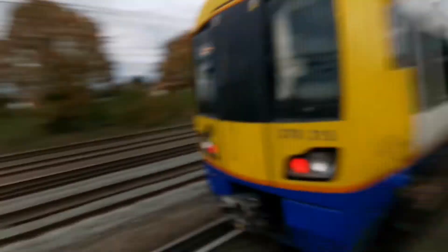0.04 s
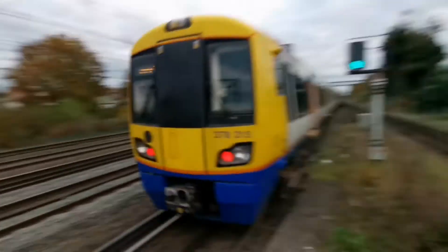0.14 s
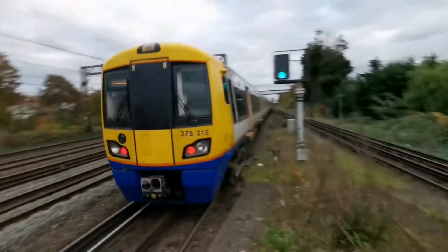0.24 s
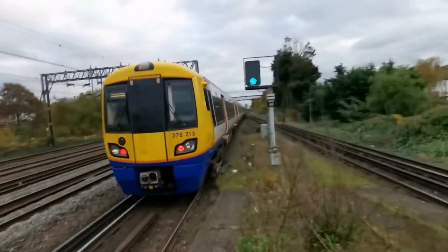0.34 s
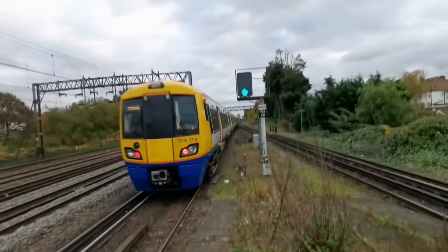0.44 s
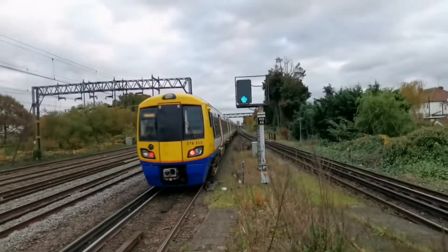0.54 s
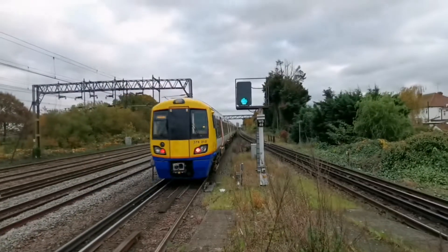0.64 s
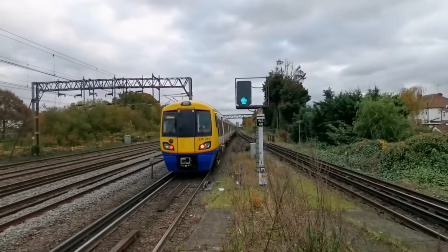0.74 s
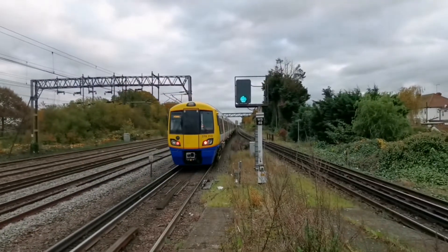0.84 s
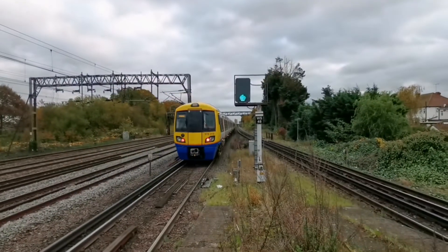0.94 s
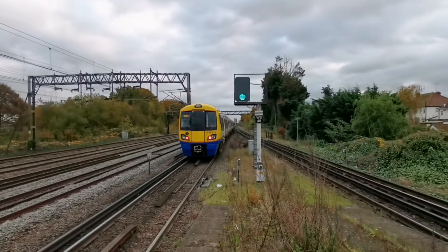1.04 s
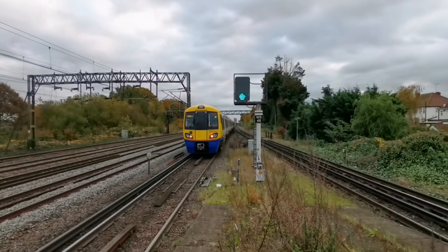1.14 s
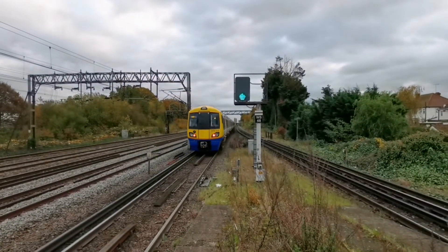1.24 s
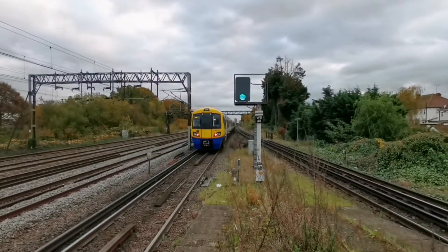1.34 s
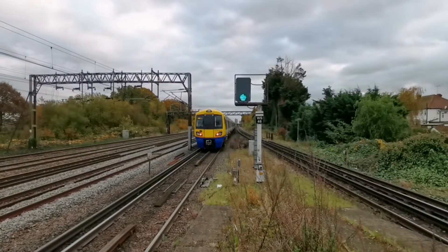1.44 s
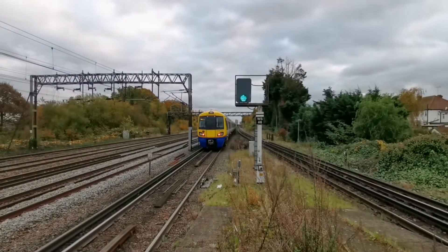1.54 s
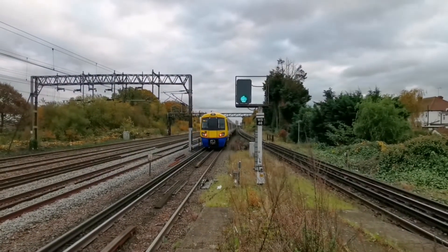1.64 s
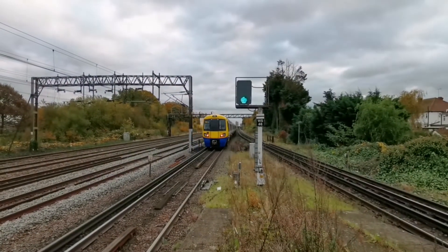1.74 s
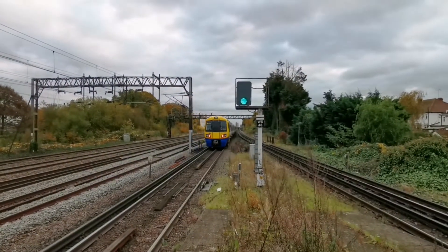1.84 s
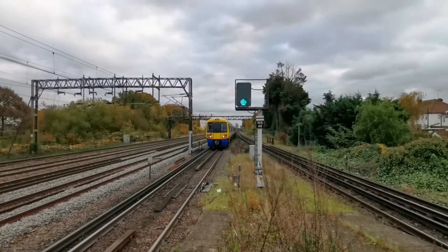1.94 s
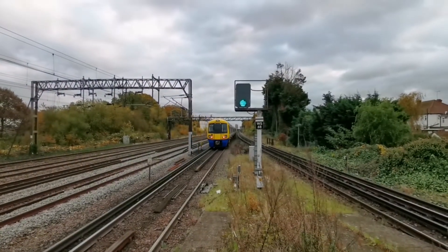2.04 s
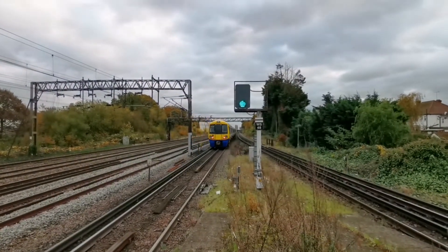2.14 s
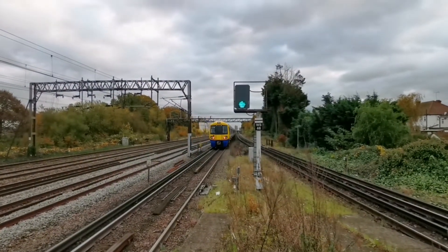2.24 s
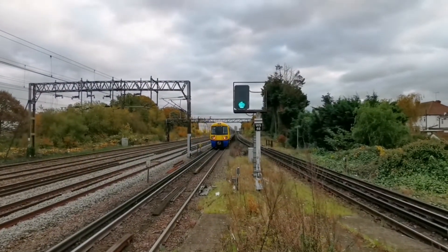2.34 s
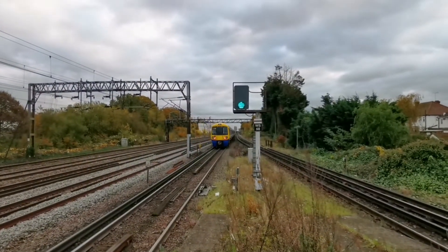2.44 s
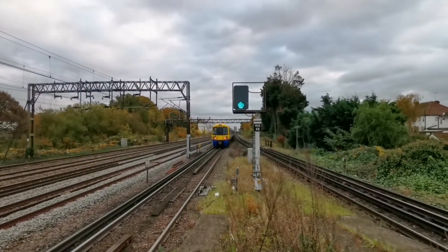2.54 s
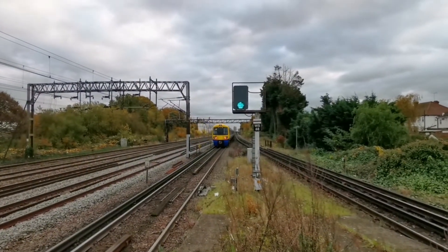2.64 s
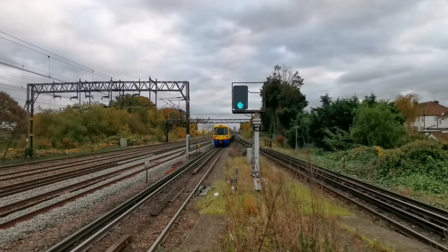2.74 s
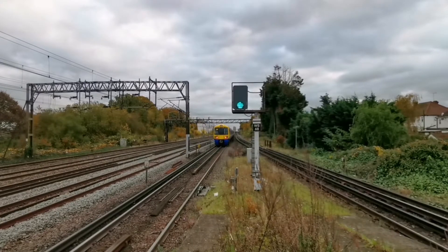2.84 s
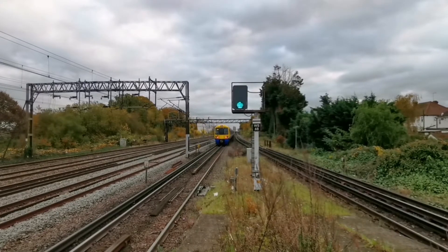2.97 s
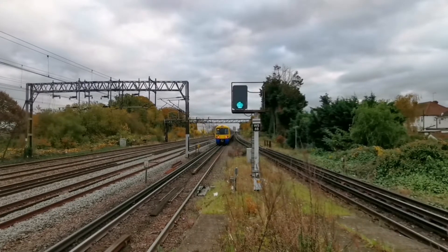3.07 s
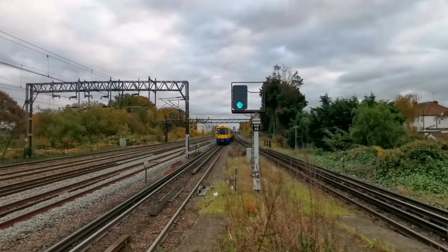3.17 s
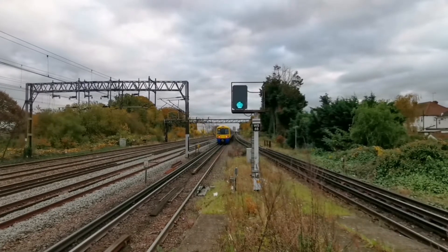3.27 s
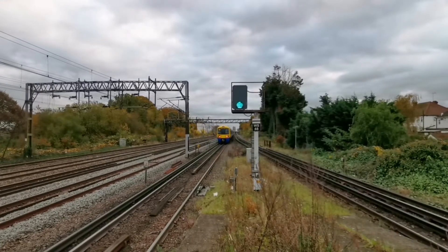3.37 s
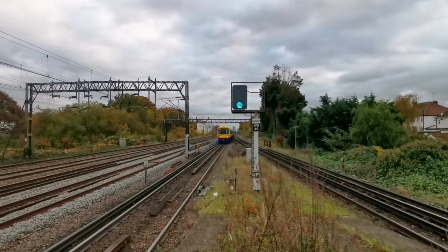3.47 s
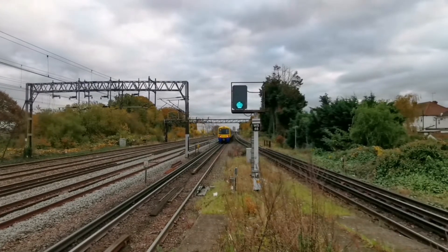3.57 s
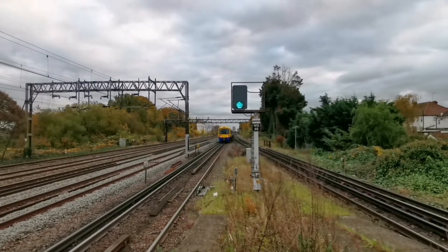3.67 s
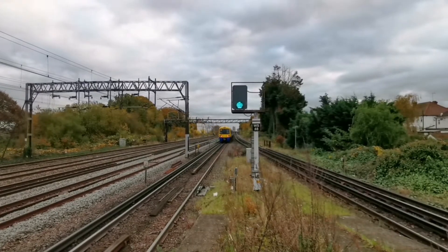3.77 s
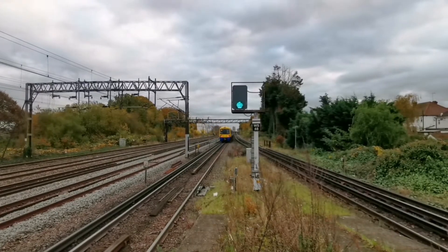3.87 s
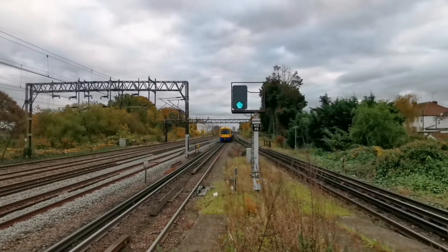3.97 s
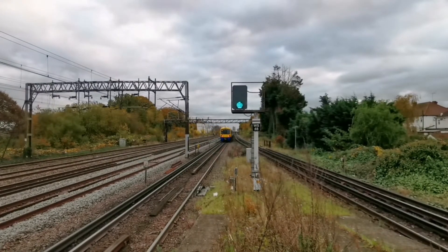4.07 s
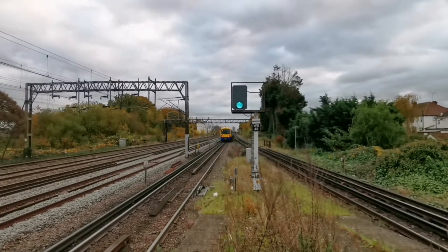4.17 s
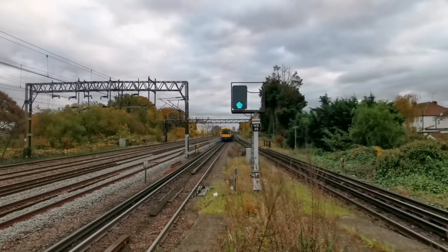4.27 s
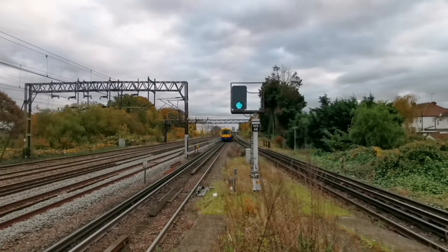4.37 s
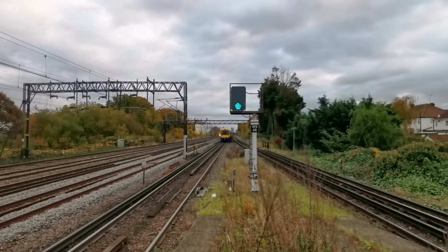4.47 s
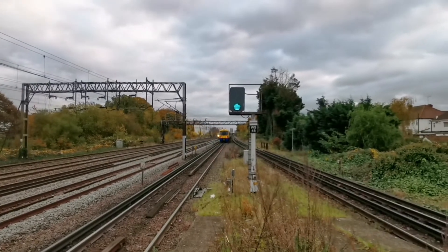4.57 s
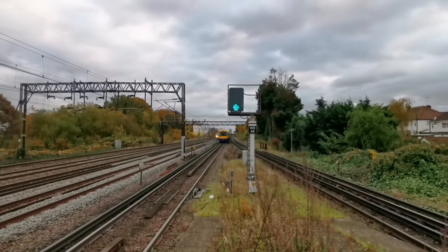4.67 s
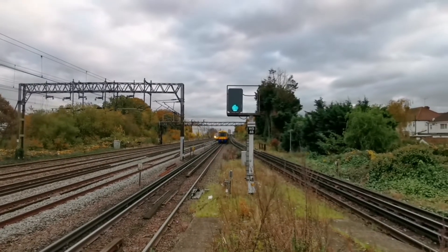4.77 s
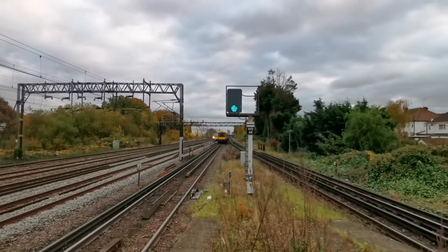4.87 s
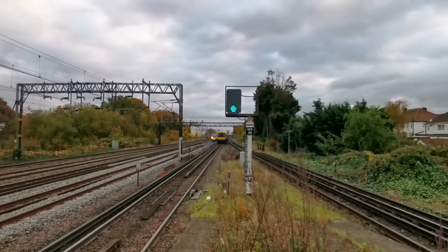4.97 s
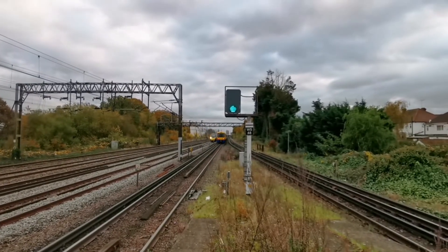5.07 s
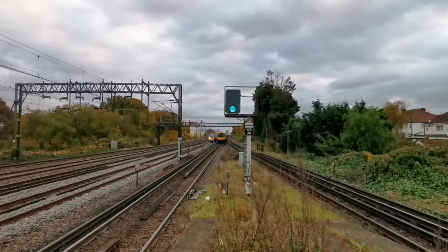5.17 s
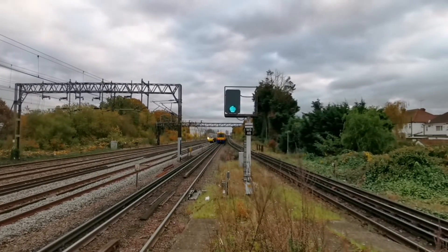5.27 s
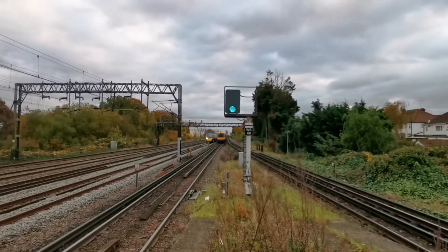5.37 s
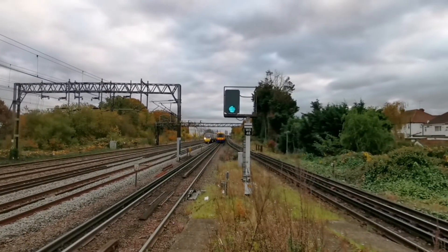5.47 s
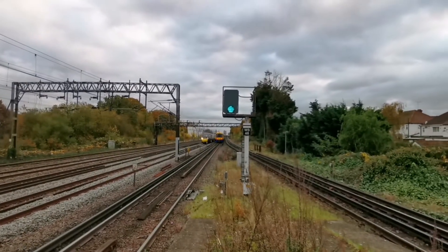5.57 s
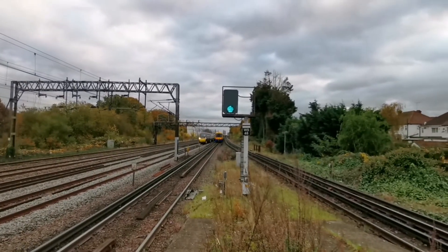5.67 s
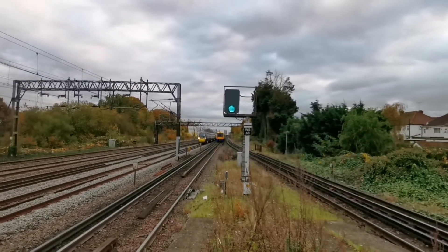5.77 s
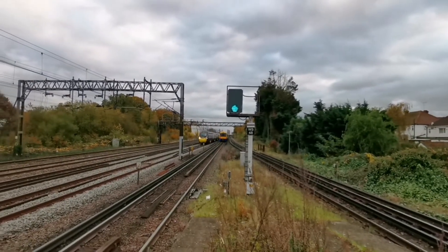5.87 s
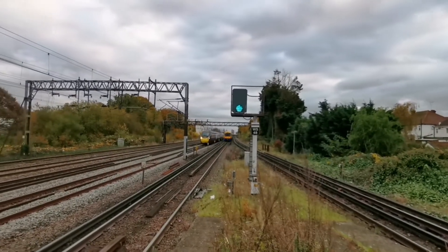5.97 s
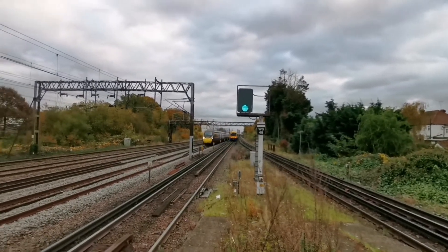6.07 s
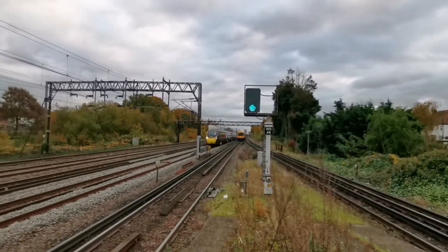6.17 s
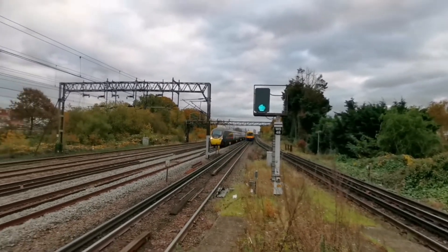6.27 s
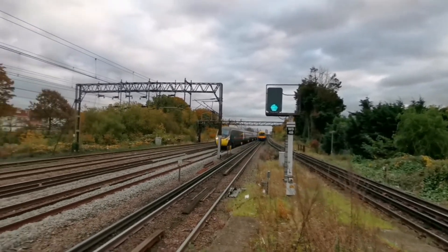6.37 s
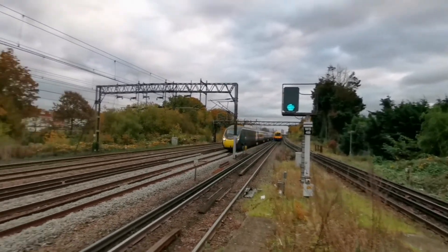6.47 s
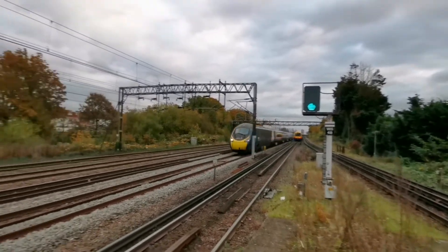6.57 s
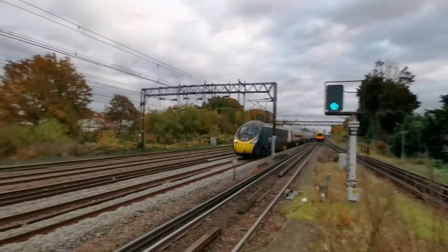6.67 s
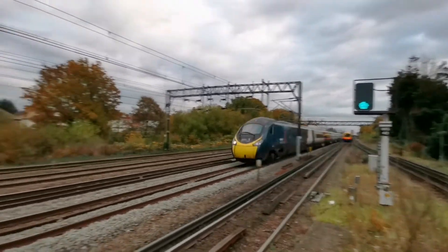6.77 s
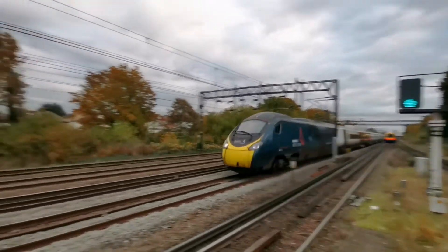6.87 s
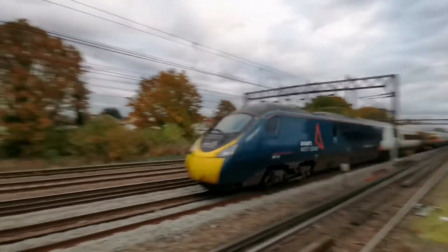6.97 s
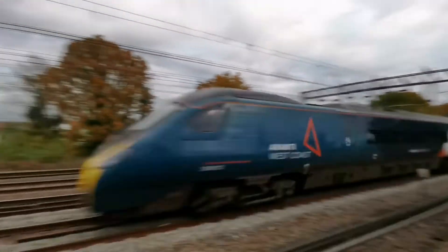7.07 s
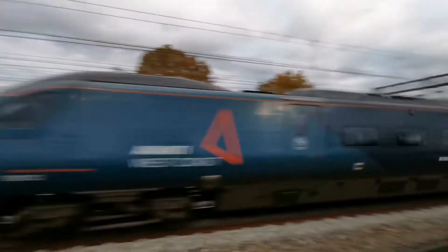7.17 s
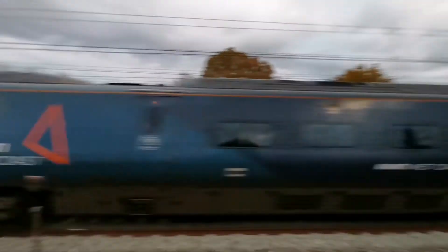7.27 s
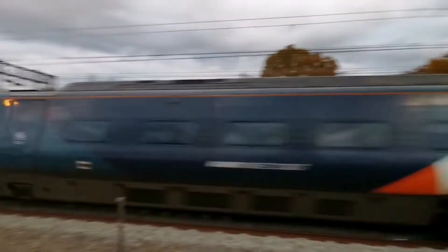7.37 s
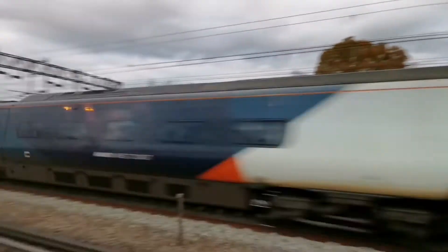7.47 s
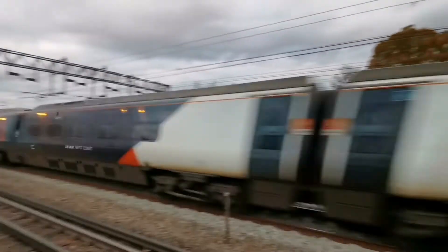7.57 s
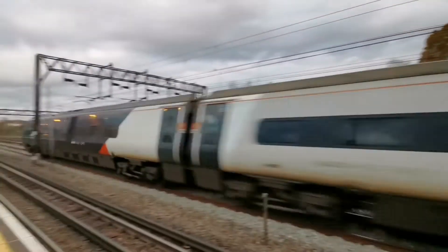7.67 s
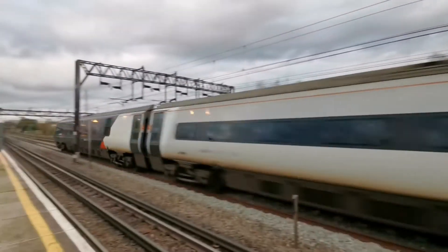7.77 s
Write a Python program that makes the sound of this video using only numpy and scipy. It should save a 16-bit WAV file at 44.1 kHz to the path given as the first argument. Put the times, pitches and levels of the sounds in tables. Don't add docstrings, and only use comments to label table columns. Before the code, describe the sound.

A departing electric train roars past close and recedes into gusty wind and track clanks, then an express rushes in whining and roars by.

```python
import sys
import numpy as np
from scipy import signal
from scipy.fft import rfft, irfft, next_fast_len
from scipy.io import wavfile
from scipy.ndimage import uniform_filter1d

SR = 44100
rng = np.random.default_rng(int(sys.argv[2]) if len(sys.argv) > 2 else 0)


def wrap_up_sound(samples):
    columns = np.atleast_2d(samples).T
    tamed = np.clip(columns, -1, 1)
    steps = np.round(tamed * 32767).astype(np.int16)
    wavfile.write(sys.argv[1], SR, steps)


def level_to_linear(level):
    exponent = np.asarray(level, float) / 20
    return 10 ** exponent


N = 344862
T = np.arange(N) / SR
LONG = next_fast_len(N)
HZ = np.fft.rfftfreq(LONG, 1 / SR)

# t/s, level/dB
LEAVING_NEARNESS = [(0.0, -4), (0.23, 0), (0.68, -3), (1.14, -9.5), (1.87, -10.5), (2.43, -17),
                    (3.2, -14.5), (3.7, -19.5), (4.6, -16)]
EXPRESS_NEARNESS = [(4.45, -35), (4.95, -29), (5.62, -22.5), (6.13, -15), (6.5, -10.5), (6.9, -6.5),
                    (7.15, -2.5), (7.55, -0.5), (7.82, -3)]
# t/s, spread/s
LEAVING_CAB = (0.92, 0.41)
EXPRESS_CAB = (7.06, 0.41)
BAND_EDGES = [25, 350, 1500, 5000, 15500]
# level when nearest/dB, share of nearness followed, extra level beside the cab/dB
LEAVING_LAYERS = [
    (-24.5, 0.95, 2.5),
    (-30, 0.75, -2.5),
    (-25, 0.99, 0.5),
    (-42.5, 1.23, -1.5),
]
EXPRESS_LAYERS = [
    (-19, 0.46, 5.4),
    (-26, 0.51, 8.8),
    (-11.5, 0.98, 0.85),
    (-27.5, 0.98, 0.8),
]
# f/Hz, level per Hz/dB
LEAVING_NEAR = [(12, -39), (20, -38), (55, -3), (220, -17.5), (307, -15.5), (770, -24), (1140, -22.5),
                (1460, -26.5), (2550, -24.5), (2930, -24), (3460, -25.5), (4980, -21.5), (7770, -36),
                (12100, -39.5), (15600, -52)]
LEAVING_FAR = [(12, -30), (20, -19), (104, -3.5), (196, -8), (466, -19.5), (728, -9.5), (935, -14.5),
               (1110, -15.5), (1540, -19.5), (2100, -19.5), (2620, -14), (3280, -20.5), (4580, -24.5),
               (7560, -48), (15600, -35)]
EXPRESS_NEAR = [(12, -31), (20, -12), (66, -4.5), (149, -19.5), (181, -13), (536, -19.5), (770, -7.5),
                (1200, -18), (1460, -12), (1680, -12), (2350, -3), (3660, -18.5), (4100, -16.5),
                (7560, -35.5), (15600, -34.5)]
EXPRESS_FAR = [(12, -40), (20, -6.5), (70, 23.5), (109, -28), (149, -16.5), (307, -18.5), (417, -36),
               (536, -24), (748, -20), (1050, -25.5), (2410, -19.5), (4330, -25.5), (7770, -55.5),
               (11800, -25.5), (15600, -23.5)]
# f/Hz, width/Hz, level/dB
LEAVING_RING = [(750, 38, 3), (1080, 48, 4.5), (2060, 350, 6.5), (2590, 140, 2.5), (2882, 123, 6.5),
                (4030, 260, 1.5)]
EXPRESS_RING = [(559, 16, 0.63), (920, 33, 1.3), (2420, 33, 1.6), (2920, 42, 1.9), (7000, 370, 2.7)]
# f/Hz, left-right level/dB
LEAN = [(100, -1), (340, -2.5), (700, -5), (1400, -5.5), (2100, -8.5), (2900, -13), (4500, -12),
        (6000, -13.5), (7600, 12), (8800, 12), (10300, -1), (13000, -5.5), (14200, -13), (15500, -16)]
# f/Hz, likeness (0-1), left lead/rad
LEAVING_PORTS = [(170, .97, -.1), (340, .95, -.2), (700, .75, -.3), (1030, .6, -1.1), (1400, .3, -1.3),
                 (1750, .15, -1), (2400, .55, .1), (2900, .55, -.3), (3500, .15, -1.5), (4500, .3, -.9),
                 (8000, .15, 2.5), (13000, .3, -1.5)]
EXPRESS_PORTS = [(170, .97, -.1), (340, .92, -.1), (700, .8, 0), (1030, .65, .6), (1400, .4, 2.2),
                 (1750, .4, 2.2), (2400, .5, .7), (2900, .4, .5), (3500, .4, 2.2), (4500, .3, -.8),
                 (8000, .1, 1), (13000, .2, -2.5)]
# t/s, treble left-right level/dB
SWING = [(0, -4.5), (.3, -14), (1.2, -9), (5.8, -8.5), (6.37, -14.5), (6.7, -10.5), (7.1, -9), (7.6, -1.5)]
# t/s, length/s,
# level/dB, f/Hz, width/Hz
PUFFS = [(0, 0.136, -28, 330, 304), (0.09, 0.21, -33, 1300, 230), (0.168, 0.069, -52, 9250, 1000),
         (.17, 0.084, -44.5, 12200, 1500), (.172, 0.077, -24.5, 2970, 300), (.55, 0.29, -34, 140.3, 50),
         (0.8, 0.029, -30, 684, 290), (1.0, 0.23, -36, 124.8, 43), (1.132, 0.11, -42.5, 330, 80),
         (1.55, 0.14, -44, 4640, 270), (1.554, 0.22, -35.5, 2780, 400), (1.66, .08, -60, 11000, 3000),
         (1.665, .08, -49, 4500, 900), (3.78, 0.137, -39, 2880, 360), (3.908, .13, -40.5, 4654, 710),
         (3.915, .12, -66, 11000, 4000), (3.934, 0.11, -34, 2770, 555.6), (4.141, 0.17, -39, 896, 520),
         (4.59, 0.039, -42, 3800, 1200), (5.851, .35, -36, 1150, 200), (6.5, .3, -36.5, 1050, 216),
         (6.88, .04, -34, 4500, 900), (6.952, 0.38, -29, 1080, 200), (6.961, 0.315, -35, 370, 80.5),
         (7.04, 0.33, -24, 188.6, 59), (7.157, 0.076, -19, 3900, 130), (7.2, .25, -31, 110, 34),
         (7.236, 0.062, -23, 4200, 160), (7.396, 0.37, -33, 689, 28)]
# f/Hz, level per Hz/dB
FLOOR = [(2650, -40), (4500, -12), (5780, -7), (6180, -14), (7150, -3), (7650, -18), (7970, -19),
         (8800, -19), (10100, -22), (10900, -9), (11100, -10), (15600, 0.5)]
# t/s, peak level/dB, f/Hz,
# left-right level/dB
THUMPS = [(0.1, -16, 61, -3), (0.429, -8.5, 168, -2.5), (0.484, -22, 75, -2), (0.593, -20.5, 176, -3.0),
          (0.622, -20, 120, -2), (0.648, -21, 159, 1), (0.69, -24, 125, -2), (0.748, -21.5, 125, -2),
          (0.78, -22, 151, -2), (0.839, -23.5, 124, -3.5), (0.975, -27.5, 128, -1),
          (1.027, -23.5, 140, -3.5), (1.077, -24, 121, -4.5), (1.203, -23.5, 114, -2.0),
          (1.564, -26.5, 194, -1.5), (1.736, -36, 202, -2), (1.795, -33, 113, 0), (2.656, -23, 104, -18),
          (2.747, -22.5, 105, 7), (2.79, -25, 190, 0), (3.187, -20, 168, -12), (3.363, -21, 145, -1),
          (3.389, -19, 148, -28), (3.43, -19, 101, 9), (3.508, -17, 187, -22), (3.811, -20.5, 61.9, 21),
          (3.891, -23, 84, 9), (4.272, -26, 187, -2), (4.293, -18, 170, -2)]
# f/Hz, level/dB, width/Hz
RAIL_SONG = [(11434, -75, 14), (11940, -84, 30), (12780, -81, 20), (12909, -80, 20), (13491, -83, 30),
             (14950, -79, 20), (15633, -77, 24)]
# t/s, level/dB
SONG_SWELL = [(1.5, -12), (2.2, -2), (3.6, 0), (5, 8), (6.3, 15), (7.82, 10)]
# t/s, peak level/dB, rail pitch f/Hz, thud level/dB, crack level/dB
CLANKS = [(1.971, -29.5, 1080, 0, -32), (2.027, -24.5, 718, 0, -24), (2.06, -37, 825, 3, -26),
          (2.149, -21.5, 1098, -9.5, -46), (2.173, -32.5, 1093, 8, -28), (2.207, -19, 848, -2.5, -24),
          (2.234, -36, 860, -14, -3), (2.806, -39.5, 867, 9, -3.5), (2.966, -32, 786, 1.5, -8.5),
          (3.242, -32, 1080, -3, -31), (3.398, -34, 813, 7.5, -21), (4.004, -36, 1122, -13, -13),
          (4.011, -27, 1112, -13, -13), (4.13, -30, 760, -3, -15), (4.136, -24, 1200, -4.5, -28),
          (4.147, -29, 900, -1, -15), (4.177, -19, 1112, -10.5, -59), (4.189, -25.5, 986, -5, -50),
          (4.296, -21.5, 873, -8, -30), (4.304, -13.5, 778, -10, -20.5), (4.324, -25.5, 920, -7, -23),
          (4.345, -38, 675, -2, -12), (4.409, -49, 726, -14, 3)]
# multiple of its pitch, level/dB
RAIL_MODES = [(.82, -8), (1, 3), (1.2, -9)]
UPPER_MODES = [1.9, 2.4, 2.6]
# t/s, level/dB, spread/s, left-right level/dB
WIND = [(2.04, -43, 0.042, -1), (2.22, -25.5, 0.069, -4.5), (2.38, -33, 0.067, 3), (2.57, -33, 0.15, -33),
        (2.78, -31.5, 0.21, 0), (2.97, -37, 0.091, -3), (3.191, -23.5, 0.052, -11),
        (3.37, -24.5, 0.076, -9), (3.47, -30, 0.037, 17), (3.52, -22, 0.037, -14), (3.7, -27.5, 0.15, 1),
        (3.92, -33.5, 0.096, -3), (4.13, -31, 0.26, 5.5), (4.3, -30, 0.033, 0), (4.69, -30.5, 0.054, 3),
        (4.85, -37.5, 0.14, 1.5), (5.08, -38, 0.071, -5), (5.42, -36.5, 0.049, -13)]
# f/Hz, level per Hz/dB
GUST = [(8.8, -19), (15, 2.5), (59, 5.5), (145, -5), (250, -13), (524, -25), (606, -16.5), (700, -52),
        (910, -16), (1540, -120)]
# loudest t/s, level/dB, spread/s, slope coming and going/dB per tenfold distance
MOTOR = [
    (7.02, -22.5, 0.24, 16, 67),
    (7.1, -21.5, 0.095, 21, 10.8),
    (7.043, -22.5, 0.24, 37.5, 42),
]
# t/s, level/dB
SURGES = [
    (6.35, 4.8),
    (6.1, 8.3),
    (6.65, 6.2),
]
# f/Hz, level/dB, width/Hz
HUM = [(64.6, 0, 24)]
LOW_WHINE = [(673, -14, 30), (764, 0, 14), (802, -10, 30), (846, -6, 24), (904, -13, 30), (947, -14, 30),
             (1001, -14, 40)]
HIGH_WHINE = [(1470, -5, 70), (1508, -2, 22), (1852, -6, 16), (2256, -5, 30), (2290, -1, 24),
              (2374, -5, 30), (2412, -7, 18), (3350, -12, 90), (12647, -23, 60)]
# t/s, pitch factor
DOPPLER = [(4.4, .985), (6.1, .997), (7.17, 1), (7.26, .96), (7.36, .908), (7.82, .897)]
# t/s abreast, level/dB, upper-mode level/dB
BOGIES = [(7.25, -24, 6.5), (7.35, -21, -2.5), (7.62, -17, -1.5), (7.71, -21.5, -3.5), (7.95, -12, -10)]
# f/Hz, width/Hz, level/dB
WHEEL = [(1950, 75, -18), (2153, 80, 0.5), (2480, 86, -3), (2944, 95, -6), (3684, 290, -10.5),
         (4650, 350, -16.5)]
# f/Hz, level/dB
MIC = [(2500, -0.5), (3100, -2), (3400, -2), (4700, -2), (5800, -2), (6800, 0), (7600, -2), (8800, 2),
       (10300, 0), (11500, -0.5), (13000, -1), (14000, -7), (15400, -3)]


def evened(x):
    return x / np.sqrt(np.mean(x ** 2) + 1e-20)


def read(points, hz):
    f, value = np.transpose(points)
    return np.interp(np.log(hz + 1), np.log(f + 1), value)


def likeness(ports, hz):
    return np.clip(read(np.array(ports)[:, :2], hz), 0, 1)


def lead(ports, hz):
    return read(np.array(ports)[:, ::2], hz)


def partly_shared(both, own, same):
    return same * both + np.sqrt(1 - same ** 2) * own


def add(mix, s, sound):
    part = mix[:, round(s * SR):][:, :sound.shape[1]]
    part += sound[:, :part.shape[1]]


def panned(x, lean_db):
    left = level_to_linear(lean_db)
    return np.array([left * x, x * np.ones_like(left)]) * 2 / (1 + left)


def band(x, lo_hz, hi_hz):
    return signal.sosfilt(signal.butter(3, [lo_hz, hi_hz], "band", fs=SR, output="sos"), x)


def coloured(x, gain):
    return irfft(rfft(x, LONG) * gain, LONG)[:, :N]


def whistle(hz, width_hz):
    r = np.exp(-np.pi * width_hz / SR)
    slow = rng.standard_normal(len(hz)) + 1j * rng.standard_normal(len(hz))
    slow = signal.lfilter([1], [1, -2 * r, r * r], slow)
    return slow * np.exp(2j * np.pi * np.cumsum(hz) / SR) * np.sqrt(2 / np.mean(abs(slow) ** 2))


def dying(t, s):
    return level_to_linear(-60 * t / s)


def train(nearness, layers, cab, near, far, ring, ports, patchy_db, swell_db):
    frames, hz = N // 256 + 5, np.fft.rfftfreq(1024, 1 / SR)
    t = np.arange(frames) * 256 / SR
    s, near_db = np.transpose(nearness)
    near_db = np.interp(t, s, near_db)
    abreast = np.exp(-((t - cab[0]) / cab[1]) ** 2)
    levels = [db + share * near_db + cab_db * abreast for db, share, cab_db in layers]

    close = (near_db - near_db.min()) / np.ptp(near_db)
    colour = np.outer(read(near, hz), close) + np.outer(read(far, hz), 1 - close)
    colour += sum(db * np.exp(-((hz - f) / w) ** 2) for f, w, db in ring)[:, None]

    inside = np.array([(hz >= lo) & (hz < hi) for lo, hi in zip(BAND_EDGES, BAND_EDGES[1:])], float)
    lift = np.array(levels) - 10 * np.log10(inside @ level_to_linear(2 * colour))
    centres_hz = [250, 700, 2800, 8000]
    blend = np.array([read(list(zip(centres_hz, row)), hz) for row in np.eye(4)])

    a, b, c, d, patches = rng.standard_normal((frames, 513, 5)).T
    patches = uniform_filter1d(patches, size=3, axis=0)
    patches = evened(uniform_filter1d(patches, size=36, axis=1))
    swell = evened(uniform_filter1d(rng.standard_normal(frames), size=14))
    level = level_to_linear(colour + blend.T @ lift + patchy_db * patches + swell_db * swell)

    swing_db = np.interp(t, *np.transpose(SWING)) - read(LEAN, 2130.0)
    left = level_to_linear(read(LEAN, hz)[:, None] + np.outer(np.clip(hz / 2500.0, 0, 1), swing_db))
    same = likeness(ports, hz)[:, None]
    phase = lead(ports, hz)[:, None]
    both, own = a + 1j * b, c + 1j * d
    z = np.array([left * np.exp(1j * phase) * both, partly_shared(both, own, same)])
    z *= level / np.sqrt(1 + left ** 2 + 2 * same * left * np.cos(phase))

    fade = np.interp(T, [s[0] - .3, s[0], s[-1] - .1, s[-1] + .2], [0, 1, 1, s[-1] > 7])
    return 1.445 * fade * signal.istft(z, nperseg=1024, noverlap=768)[1][:, :N]


def puffs():
    out = np.zeros((2, N))
    for s, length, db, hz, width in PUFFS:
        count, same = int(length * SR), likeness(LEAVING_PORTS, hz)
        both, own = whistle(np.full(count, hz), width), whistle(np.full(count, hz), width)
        left = level_to_linear(read(LEAN, hz)) * both * np.exp(1j * lead(LEAVING_PORTS, hz))
        pair = np.array([left, partly_shared(both, own, same)])
        add(out, s, level_to_linear(db) * pair.real * signal.windows.tukey(count, .4) / np.sqrt(1 + same))
    return out


def floor():
    colour = panned(level_to_linear(read(FLOOR, HZ)), read(LEAN, HZ))
    return level_to_linear(-56.5) * evened(coloured(rng.standard_normal((2, N)), colour))


def thumps():
    out = np.zeros((2, N))
    for s, db, hz, lean_db in THUMPS:
        cycles = 1.13 + .011 * hz
        u = np.linspace(0, 1, int(SR * cycles / hz * 1.374))
        push = np.sin(2 * np.pi * cycles * 1.354 * u * (1.35 - 0.29 * u))
        push = push * np.sin(np.pi * u ** 1.01) ** 2
        add(out, s - .003, panned(level_to_linear(db) * push, lean_db))
    return out


def rails():
    swell = level_to_linear(np.interp(T, *np.transpose(SONG_SWELL), left=-40))
    out = np.zeros((2, N))
    for f, db, width in RAIL_SONG:
        out += panned(level_to_linear(db) * swell * whistle(np.full(N, f), width).real, read(LEAN, f))
    return out


def clanks():
    out, t = np.zeros((2, N)), np.arange(5000) / SR
    decay = dying(t, .055) * (1 - np.exp(-t / .004)) ** 2
    for s, db, hz, thud_db, crack_db in CLANKS:
        a, b, c = rng.standard_normal((3, len(t)))
        low = sum(level_to_linear(g) * np.sin(2 * np.pi * (hz * m * t + rng.random())) for m, g in RAIL_MODES)
        low = evened(low) + 0.36 * evened(band(a, 650.0, 1400.0))
        upper = sum(np.sin(2 * np.pi * (hz * m * t + rng.random())) for m in UPPER_MODES)
        upper = evened(upper) + 0.79 * evened(band(a, 1200.0, 2960.0))
        ring = low + level_to_linear(3 + 0.39 * crack_db) * upper

        crack = evened(band(band(np.array([b, c]), 3050.0, 4700.0), 2000., 5800.0))
        crack = crack * (decay + 0.47 * dying(t, 0.47))
        thud = whistle(np.full(len(t), 200.), 81.0).real + 0.59 * whistle(np.full(len(t), 330.), 66.0).real
        thud = thud * dying(t, 0.13) * (1 - np.exp(-t / 0.0012))
        tail = 0.4 * evened(band(np.array([c, a]), 550.0, 2070.0))
        tail = tail * dying(t, 0.19) * (1 - np.exp(-t / 0.0057))

        ringing = panned(1.45 * ring * decay, -6.0) + tail * level_to_linear([[-3.], [2.]])
        blow = level_to_linear(crack_db) * crack * level_to_linear([[-7.], [3.]]) + panned(level_to_linear(thud_db) * thud, -1.4)
        add(out, s - .002, level_to_linear(db) * ringing)
        add(out, s - .001, level_to_linear(db) * blow)
    return out


def wind():
    air = coloured(rng.standard_normal((2, N)), level_to_linear(read(GUST, HZ)))
    lumps = evened(uniform_filter1d(rng.standard_normal((2, N)), size=1500))
    t = T[::128]
    power = np.zeros((2, len(t)))
    for s, db, spread, lean_db in WIND:
        power += panned(level_to_linear(db) * np.exp(-((t - s) / spread) ** 2), lean_db) ** 2
    gain = np.array([np.interp(T, t, np.sqrt(port)) for port in power])
    return band(evened(air * level_to_linear(2.5 * lumps)) * gain, 2.7, 660.0)


def motors():
    t = T[T > 4.4]
    doppler = np.interp(t, *np.transpose(DOPPLER))
    out = np.zeros((2, N))
    groups = zip((HUM, LOW_WHINE, HIGH_WHINE), MOTOR, SURGES)
    for lines, (s, top_db, spread, coming_db, going_db), (surge, surge_db) in groups:
        slope_db = np.where(t < s, coming_db, going_db)
        level_db = top_db - slope_db * np.log10(np.hypot(1, (t - s) / spread))
        level_db += surge_db * np.exp(-((t - surge) / 0.12) ** 2)
        for hz, db, width in lines:
            breakup = evened(uniform_filter1d(rng.standard_normal(len(t)), size=3000))
            steady = np.exp(2j * np.pi * np.cumsum(hz * doppler) / SR)
            tone = .45 * steady + .9 * whistle(hz * doppler, width)
            tone = level_to_linear(db + 1.2 * breakup + level_db) * tone
            left = level_to_linear(read(LEAN, hz)) * np.exp(1j * lead(EXPRESS_PORTS, hz))
            out[:, -len(t):] += np.real([left * tone, tone])
    return 1.37 * out * np.clip(T - t[0], 0, 1)


def wheels():
    speed_m_s, track_m, sound_m_s = 45., 6., 343
    out, t = np.zeros((2, N)), T[T > 6.6]
    for s, db, upper_db in BOGIES:
        along = speed_m_s * (s - t)
        away = np.hypot(along, track_m)
        doppler = 1 / (1 - speed_m_s / sound_m_s * along / away)
        lean_db = -5. - 3.7 * along / away
        roughness = evened(uniform_filter1d(rng.standard_normal(len(t)), size=500))
        ring = np.zeros((2, len(t)))
        for f, width, g in WHEEL:
            both, own = whistle(f * doppler, width), whistle(f * doppler, width)
            pair = [both * np.exp(1j * lead(EXPRESS_PORTS, f)), partly_shared(both, own, .45)]
            ring += level_to_linear(g + upper_db * (f > 2700)) * np.real(pair)
        level = level_to_linear(db) * level_to_linear(3.5 * roughness) * (track_m / away) ** 2.33
        out[:, -len(t):] += ring * panned(level, lean_db)
    return out


def scene():
    leaving = train(LEAVING_NEARNESS, LEAVING_LAYERS, LEAVING_CAB, LEAVING_NEAR, LEAVING_FAR,
                    LEAVING_RING, LEAVING_PORTS, patchy_db=2.1, swell_db=1.0)
    express = train(EXPRESS_NEARNESS, EXPRESS_LAYERS, EXPRESS_CAB, EXPRESS_NEAR, EXPRESS_FAR,
                    EXPRESS_RING, EXPRESS_PORTS, patchy_db=1.5, swell_db=0.57)
    air = puffs() + floor() + thumps() + wind()
    return leaving + express + air + rails() + clanks() + motors() + wheels()


def top_cut(x):
    return signal.sosfilt(signal.butter(12, 15800, fs=SR, output="sos"), x)


def record(dry):
    heard = np.tanh(0.97 * coloured(dry, level_to_linear(read(MIC, HZ))))
    return top_cut(heard)


dry = scene()
out = record(dry)
wrap_up_sound(out)
```